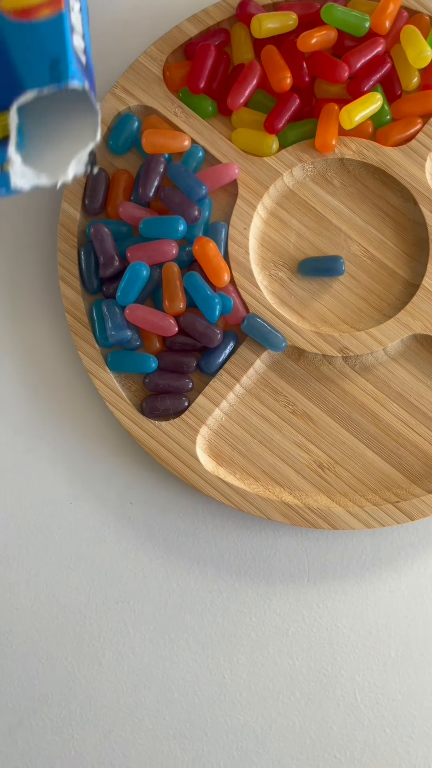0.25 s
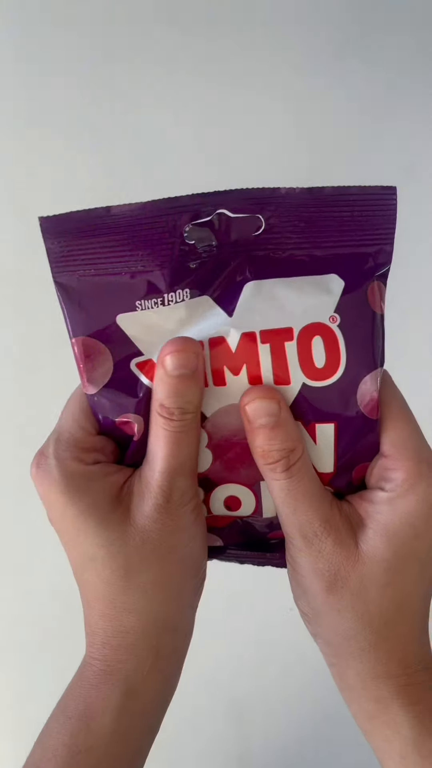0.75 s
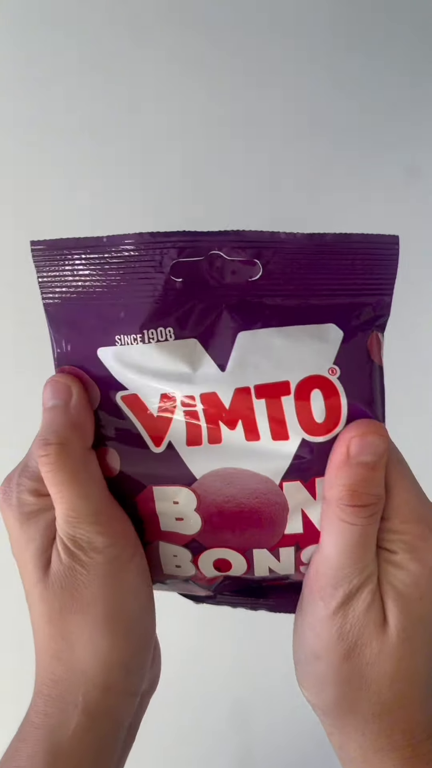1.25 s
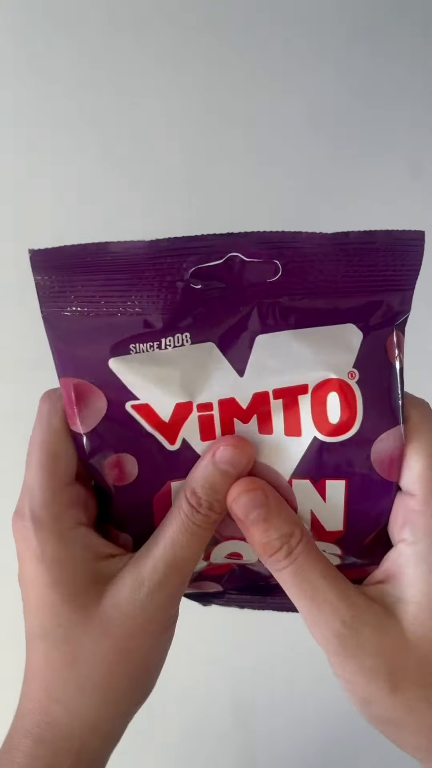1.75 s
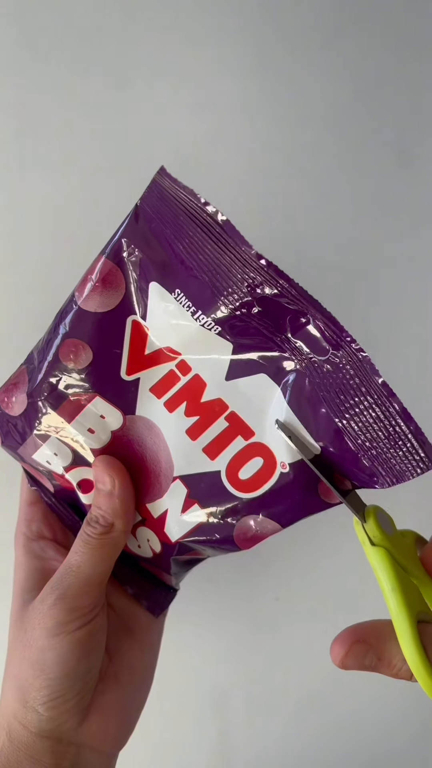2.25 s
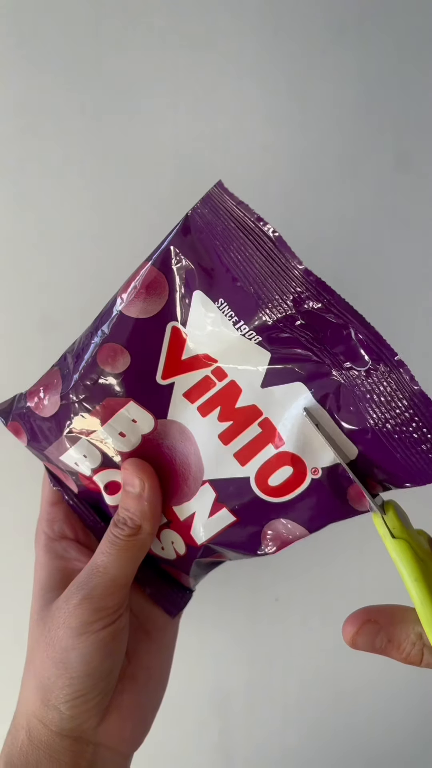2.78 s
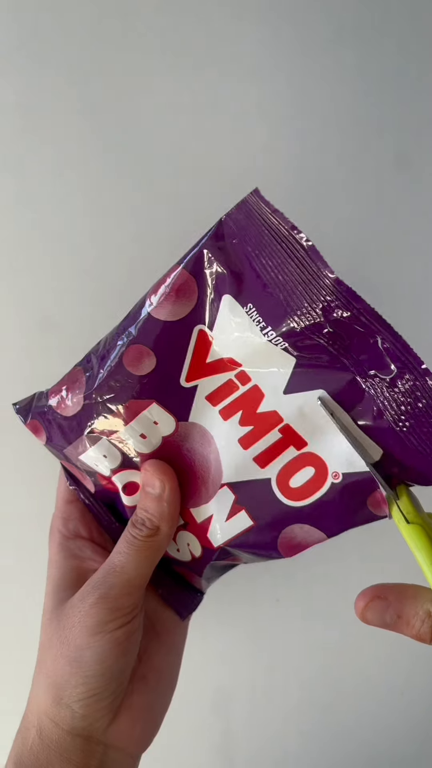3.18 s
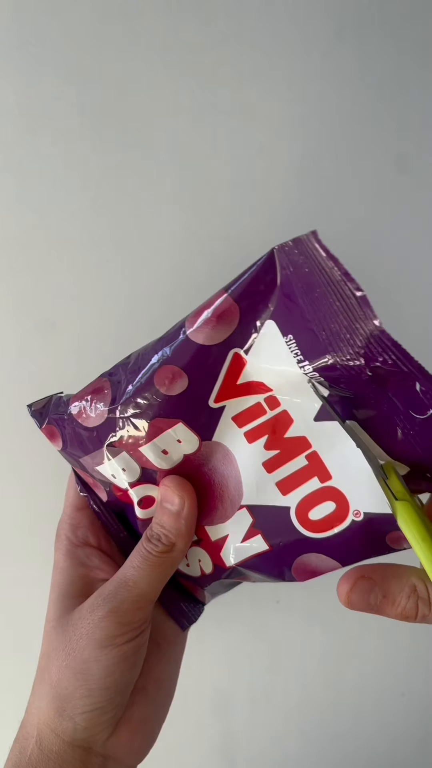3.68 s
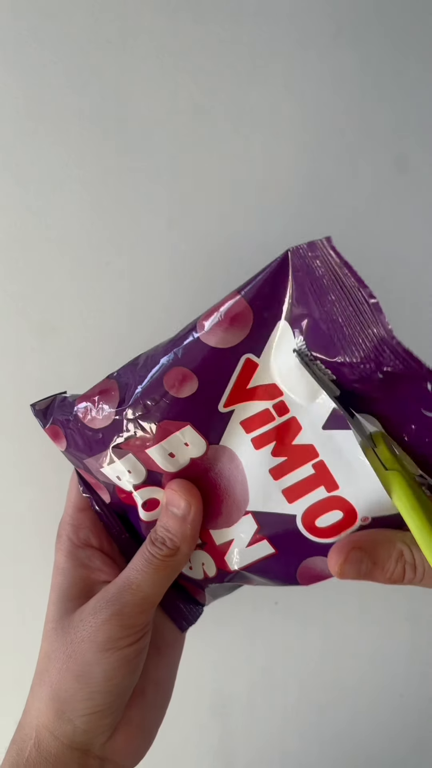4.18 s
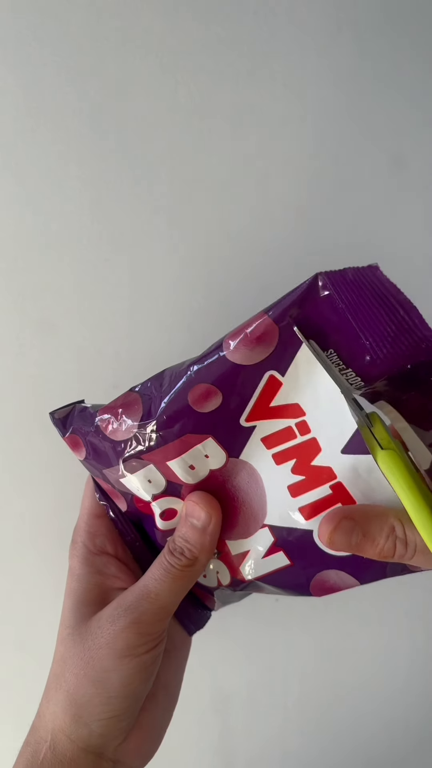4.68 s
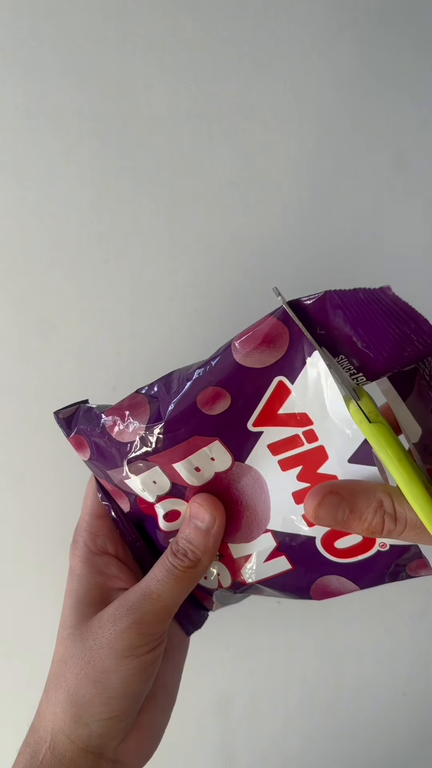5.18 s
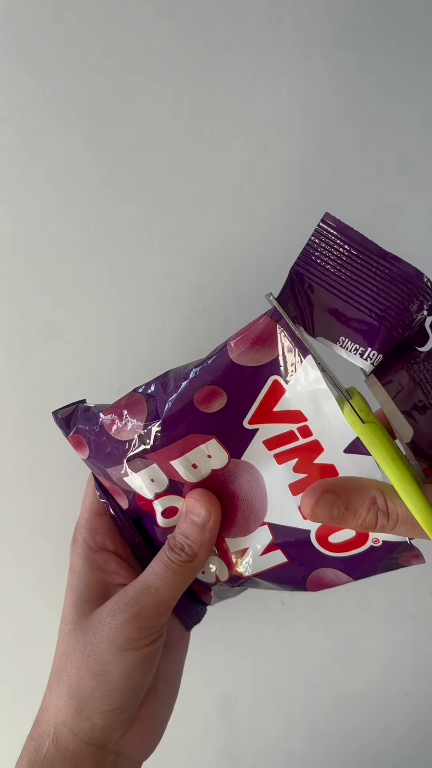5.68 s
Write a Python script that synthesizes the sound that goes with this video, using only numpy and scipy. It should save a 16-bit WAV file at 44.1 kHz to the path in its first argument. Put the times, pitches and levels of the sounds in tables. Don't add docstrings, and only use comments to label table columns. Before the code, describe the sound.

Close up in a small dry room, hard sweets pour from a cardboard box onto a wooden platter with a woody rattle that swells and thins. An abrupt cut brings loud, crisp foil-bag crackling in three squeezes. Another cut leads to softer, sparser crinkles as scissors bite through, with two small hollow handle knocks and faint table bumps. Phone microphone just above.

```python
import sys
import numpy as np
from scipy import signal
from scipy.fft import rfft, irfft, next_fast_len
from scipy.io import wavfile

SR = 44100
rng = np.random.default_rng(int(sys.argv[2]) if len(sys.argv) > 2 else 0)


def waveform_to_disk(signal):
    frames = np.transpose(np.atleast_2d(signal))
    scaled = np.clip(frames, -1, 1) * 32767
    samples = np.round(scaled).astype(np.int16)
    wavfile.write(sys.argv[1], SR, samples)


def voltage_ratio(decibels):
    exponent = np.asarray(decibels, float) / 20
    return 10 ** exponent


N = 261954
TIME_S = np.arange(N) / SR
KNEAD_START_S, CUT_START_S = 0.622, 2.008
KNEADING = TIME_S < CUT_START_S
FOIL_CYCLES, SWEET_CYCLES = 6.5, 14


def unit(x):
    return x / np.sqrt(np.mean(x ** 2) + 1e-20)


def peak_one(rows):
    return rows / np.abs(rows).max(axis=1, keepdims=True)


def in_time(rows):
    start_s, *columns = np.transpose(rows)
    return [np.interp(TIME_S, start_s, column) for column in columns]


def at_hz(points, hz):
    table_hz, value = np.transpose(points)
    return np.interp(np.log(hz + 1), np.log(table_hz + 1), value)


def band(x, low_hz, high_hz):
    edges_hz = [low_hz, min(high_hz, 0.45 * SR)]
    return signal.sosfilt(signal.butter(2, edges_hz, "band", fs=SR, output="sos"), x)


def dull(x):
    return signal.sosfilt(signal.cheby2(8, 45, 12400 + 900, fs=SR, output="sos"), x)


def shape(x, gain):
    size = next_fast_len(N + 4096)
    spectrum = rfft(x, size) * gain(np.fft.rfftfreq(size, 1 / SR))
    return irfft(spectrum, size)[..., :N]


def ring(x, hz, t60_s):
    decay, turn = voltage_ratio(-60 / (t60_s * SR)), 2 * np.pi * hz / SR
    poles = [1, -2 * decay * np.cos(turn), decay * decay]
    return signal.lfilter([0, np.sin(turn)], poles, x + 1e-18)


def grains(per_s, spread_db, clump_db):
    clumps = np.repeat(rng.standard_normal(N // 256 + 1), 256)[:N]
    sizes = voltage_ratio(spread_db * np.minimum(rng.exponential(1, N), 4) + clump_db * clumps)
    return sizes * rng.choice([-1, 1], N) * (rng.random(N) < per_s / SR)


def snaps(table, rise_s, burst_s, cycles, tone, body_db, thud_db, crack_db):
    start_s, peak_db, body_hz, high_db = np.transpose(table)
    lead = 150
    t = np.arange(-lead, 1050) / SR
    noise = rng.standard_normal((len(start_s), len(t)))
    dying = np.exp(-t / burst_s) + voltage_ratio(-8.0) * np.exp(-t / (6 * burst_s))
    ragged = noise * np.abs(noise) * np.where(t < 0, np.exp(t / rise_s), dying)
    ragged[:, t == 0] += 11.0
    rung = np.array([ring(row, hz, cycles / hz) for row, hz in zip(ragged, body_hz)])
    click = peak_one(band(ragged, 900, 5500))
    body = peak_one(tone * peak_one(rung) + click)
    thud = peak_one(band(ragged, 290, 950))
    brief = ragged * np.exp(-np.abs(t) / (4.5 * burst_s))
    crack = peak_one(band(brief, 5200, 16000))
    out = np.zeros(N + len(t))
    for k, at in enumerate((start_s * SR).astype(int)):
        mix = voltage_ratio(body_db) * body[k] + voltage_ratio(thud_db) * thud[k] + voltage_ratio(high_db[k] + crack_db) * crack[k]
        out[at:at + len(t)] += voltage_ratio(peak_db[k]) * mix
    return out[lead:N + lead]


def echoes(x, length, decay):
    spot = np.repeat(rng.integers(0, 6, len(x) // 400 + 1), 400)[:len(x)]
    tails = rng.standard_normal((6, length)) * decay(np.arange(length) / SR)
    tails = tails / np.sqrt(np.sum(tails ** 2, axis=1, keepdims=True))
    return sum(signal.fftconvolve(x * (spot == k), tail)[:len(x)] for k, tail in enumerate(tails))


def hum():
    return voltage_ratio(-99) * unit(band(rng.standard_normal(N), 40, 3000))


def room(x):
    t60_s, tail_db, slap_s, slap_db = 0.18, -14, 0.001276, -18
    lag = round(slap_s * SR)
    slap = voltage_ratio(slap_db) * np.concatenate([np.zeros(lag), x[:-lag]])
    tail = echoes(dull(x), SR // 4, lambda t: voltage_ratio(-60 * t / t60_s) * np.clip(t / 0.0057, 0, 1))
    return x + slap + voltage_ratio(tail_db) * tail


def thumps():
    # start_s, peak_db
    bumps = [(0.659, -49), (0.922, -49), (1.128, -54), (1.131, -41), (1.282, -55), (1.576, -67),
             (1.67, -40.5), (2.211, -44), (2.519, -57), (2.645, -67), (2.732, -49), (3.41, -45),
             (3.586, -56), (3.708, -63), (3.938, -46), (4.145, -45.5), (4.388, -48.5), (4.586, -47),
             (4.761, -51), (5.216, -50), (5.325, -55), (5.444, -46.5)]
    rise_s, fall_s, level_db = 0.0053, 0.022, 9
    push = np.zeros(N)
    for start_s, peak_db in bumps:
        since_s = TIME_S - start_s
        push += voltage_ratio(peak_db) * np.clip(since_s / rise_s, 0, 1) * np.exp(-np.maximum(since_s, 0) / fall_s)
    return voltage_ratio(level_db) * push * unit(band(rng.standard_normal(N), 80, 260))


def scissors():
    # start_s, peak_db, pitch_hz, t60_s
    handles = [
        (4.168, -29, 667, 0.05),
        (5.448, -31, 653, 0.054),
    ]
    out = np.zeros(N)
    for start_s, peak_db, pitch_hz, t60_s in handles:
        click = TIME_S * SR
        click = np.arange(N) == round(start_s * SR)
        out += ring(voltage_ratio(peak_db) * click, pitch_hz, t60_s)
    return out


def grip():
    # start_s, level_db
    squeeze = [
        (0.621, -33),
        (0.732, -52),
        (0.846, -43.5),
        (0.934, -38.5),
        (1.032, -47.5),
        (1.183, -31),
        (1.27, -34),
        (1.552, -40),
        (1.902, -33),
        (2.005, -48),
    ]
    return in_time(squeeze)[0]


def strain(settle_db_per_s, rub_share):
    # greatest_strain_s, crinkle_db, build_up_s, hand_rub_re_crinkle_db
    strokes = [(2.03, -56.5, 0.046, 6), (2.126, -40.5, 0.06, -17), (2.221, -31.5, 0.047, -21),
               (2.458, -41, 0.041, -33.5), (2.55, -58.5, 0.12, 12.5), (2.669, -42, 0.09, -3),
               (2.748, -40, 0.04, -39), (2.902, -41, 0.086, -5.5), (3.077, -45, 0.24, -4),
               (3.246, -35, 0.044, -7.5), (3.299, -36.5, 0.11, -13), (3.427, -38, 0.073, -10.5),
               (3.607, -36, 0.064, -18), (3.753, -41, 0.079, -3), (4.025, -42, 0.21, -6),
               (4.135, -35.5, 0.032, -12), (4.18, -42, 0.17, -10), (4.293, -51.5, 0.071, -9),
               (4.42, -38, 0.079, -10), (4.48, -37.5, 0.046, -16), (4.614, -34.5, 0.085, -22),
               (4.79, -49, 0.047, 8.5), (4.844, -38, 0.12, -17.5), (5.036, -44, 0.17, -9),
               (5.229, -50, 0.032, -8), (5.335, -47, 0.02, -3.5), (5.458, -46, 0.032, 0.5),
               (5.903, -47.5, 0.24, -10.5)]
    build_db, build_curve = 31.5, 2.63
    peak_s, crinkle_db, build_s, rub_db = np.transpose(strokes)[:, :, None]
    t = np.arange(0, N / SR + 0.01, 0.002)
    building_db = build_db * (np.abs(peak_s - t) / build_s) ** build_curve
    loss_db = np.where(t < peak_s, building_db, settle_db_per_s * (t - peak_s))
    strongest_db = (crinkle_db + rub_share * rub_db - loss_db).max(axis=0)
    return np.interp(TIME_S, t, strongest_db)


def hands(grip_db):
    thumbs_only_db = 1.5 * (TIME_S < 1)
    knead_rub_db = grip_db - 6.5 - thumbs_only_db
    cut_rub_db = np.maximum(strain(settle_db_per_s=158.5, rub_share=0.66), -80)
    rub_db = np.where(KNEADING, knead_rub_db, cut_rub_db)
    rub = band(grains(per_s=2100, spread_db=2.5, clump_db=7.5), 200, 750)
    rumble = band(grains(per_s=560, spread_db=4.5, clump_db=2.5), 76, 237)
    return voltage_ratio(rub_db - 3.0) * unit(rub) + voltage_ratio(0.67 * rub_db - 22.5) * unit(rumble)


def jostle(grip_db):
    knocks = band(grains(per_s=160, spread_db=3.0, clump_db=3.5), 605, 1080)
    return KNEADING * voltage_ratio(grip_db - 7) * unit(knocks)


def crinkle(grip_db):
    # freq_hz, gain_db
    foil = [(500, 3), (1000, -2), (2000, -1.5), (3000, 2.5), (4500, -8.5), (7000, -10), (12000, -5),
            (16000, 12)]
    level_db = np.where(KNEADING, grip_db, strain(settle_db_per_s=238.5, rub_share=0))
    creases = grains(per_s=4000, spread_db=3.0, clump_db=2.5)
    fine = dull(shape(creases, lambda hz: voltage_ratio(at_hz(foil, hz))))
    return voltage_ratio(level_db - 8.0) * unit(fine)


def creases():
    # start_s, body_peak_db, body_hz, crack_re_body_db big creases under the thumbs, through all
    thumb_creases = [(0.6553, -18, 1670, 5.5), (0.6693, -15.5, 2650, 2.5), (0.6753, -31, 2130, -2.5),
                     (0.7052, -21.5, 1440, 17), (0.7145, -15.5, 1800, 3), (0.729, -21.5, 3120, 20),
                     (0.7736, -18.5, 2530, 18.5), (0.8216, -25, 1350, 6), (0.8541, -25.5, 1500, 14),
                     (0.8683, -22, 2680, 13), (0.8891, -23, 1530, 14.5), (0.9214, -16, 2760, 9.5),
                     (0.9384, -18.5, 2900, 12), (0.9617, -17.5, 1910, 10.5), (0.977, -23.5, 1870, -4),
                     (1.058, -26.5, 2200, -8), (1.0676, -18.5, 2630, 7), (1.0819, -19, 4450, 14),
                 (1.1209, -20, 2200, 10.5), (1.1441, -12, 2090, 10), (1.15, -13, 2730, 3),
                 (1.1728, -24, 2160, 18.5), (1.184, -15, 2500, 21.5), (1.2008, -14.5, 2370, 9),
                 (1.211, -15.5, 3080, 8), (1.232, -22, 2450, -7.5), (1.278, -21.5, 1780, 13),
                 (1.2886, -11, 2525, 17.5), (1.298, -19.5, 1540, 11), (1.3297, -21, 4700, 9),
                 (1.3457, -18.5, 4070, 16), (1.3698, -18.5, 5300, -1.5), (1.3807, -26, 3680, 8),
                 (1.4027, -19.5, 2430, 10), (1.4159, -20, 2260, -6), (1.4436, -22, 4830, 6.5),
                 (1.451, -15, 2650, -12), (1.4624, -19, 2840, -0.5), (1.4912, -18.5, 2650, 11.5),
                 (1.5232, -20, 4050, 14.5),
                     (1.5669, -14, 5050, 18.5), (1.585, -14, 2770, -50), (1.6467, -12.5, 2520, 5.5),
                 (1.6748, -14.5, 2230, 6), (1.6912, -17.5, 3720, -11), (1.7271, -12.5, 2720, -28.5),
                 (1.7468, -9.5, 3100, 10), (1.7636, -17.5, 2840, -19), (1.774, -15.5, 2840, 10.5),
                 (1.81, -18, 1420, 5), (1.8191, -17, 2100, 12), (1.85, -16.5, 2130, 15),
                 (1.8623, -16, 4980, 10.5), (1.8796, -13, 796, -14.5), (1.8933, -13.5, 1570, 12),
                 (1.9004, -11, 2970, 5), (1.9078, -26.5, 1870, -19), (1.923, -12.5, 900, 12),
                 (1.963, -27.5, 1320, 10.5), (1.991, -29.5, 2370, 2)]
    # start_s, body_peak_db, body_hz,
    # crack_re_body_db
    blade_creases = [(2.005, -38, 4600, -17), (2.078, -28.5, 3580, -51), (2.1156, -29, 2450, 17),
                     (2.1611, -30, 1480, 7), (2.2093, -23.5, 2600, 1), (2.222, -31, 3700, 17.5),
                     (2.2337, -22, 3450, -11), (2.316, -35, 2550, 20.5), (2.4481, -39.5, 2350, 18),
                     (2.4875, -35.5, 1390, 6.5), (2.5189, -33, 2840, -5.5), (2.6775, -31.5, 2560, -1.5),
                     (2.7383, -21.5, 3300, 17.5), (2.8646, -27.5, 3150, 12), (2.8749, -27.5, 2580, -21),
                     (2.941, -25, 3460, 10), (2.9833, -35, 3290, 12), (3.0312, -26.5, 2450, 9),
                     (3.0573, -29.5, 3570, 17), (3.0877, -30.5, 3020, 9), (3.1026, -37.5, 4060, 10),
                     (3.1884, -40, 2160, 3.5), (3.2271, -35, 2560, 13), (3.4025, -36, 2860, 12),
                     (3.413, -24.5, 3350, 14), (3.492, -31.5, 2800, 6.5), (3.5735, -42, 2700, -1),
                     (3.7434, -29.5, 2930, 7.5),
                     (3.943, -33, 2680, 11.5), (3.9729, -32.5, 2920, 6), (4.0133, -31.5, 3320, 16.5),
               (4.0286, -33.5, 2950, 13.5), (4.1402, -27, 4040, 15), (4.169, -28.5, 3120, 6.5),
               (4.268, -32.5, 3530, 13.5), (4.2969, -37.5, 1450, 15), (4.4086, -24, 3100, 9),
               (4.4736, -38, 1550, 18.5), (4.593, -25, 2400, 8.5), (4.6166, -23.5, 2200, 10),
               (4.6576, -29.5, 2920, 5), (4.78, -33, 3020, 9), (4.8459, -27, 5060, 9.5),
               (5.016, -27.5, 4140, 11.5), (5.149, -40.5, 3320, -22), (5.2194, -23, 3380, 9.5),
               (5.322, -27.5, 3250, 8), (5.3466, -29, 3430, 11.5), (5.4495, -26.5, 4040, 8.5),
               (5.462, -40.5, 2520, 13), (5.52, -54, 890, -25), (5.5819, -49, 1924, -5),
               (5.7173, -33, 2300, 2.5), (5.809, -36.5, 3500, -17), (5.8526, -29, 3650, 14)]
    small_ticks = [(1.139, -21, 2200, 6), (1.1815, -28, 2520, 13), (1.1935, -24, 2180, 7.5),
                   (1.8065, -27, 1510, 0.5), (2.0574, -38, 3760, -4), (3.0155, -34, 2520, 2),
                   (3.222, -47, 2500, 1), (3.387, -46.5, 2500, 11.5), (4.121, -32.5, 2190, -3),
                   (5.884, -43.5, 1420, -3)]
    # start_s, body_peak_db, body_hz,
    # crack_re_body_db
    lesser_creases = [(0.7235, -28.5, 2310, 6), (0.7367, -27, 2870, -1), (0.7463, -32, 2250, -1),
                      (0.7641, -22, 2080, -14.5), (0.7974, -20, 2450, -6), (0.806, -34, 2470, -9),
                      (0.8126, -26, 2280, 0), (0.9041, -47, 990, -7), (0.9314, -21, 2670, -16),
                      (0.946, -35, 2020, -8), (1.0991, -30.5, 2480, 5), (1.135, -28.5, 2200, 1.5),
                      (1.1789, -16, 2090, -6), (1.2182, -25, 2200, -12), (1.2535, -31, 3850, -16),
                      (1.2596, -24, 2156, -6), (1.2865, -11.5, 2280, -9), (1.3113, -17.5, 2526, -3),
                      (1.3531, -25, 2670, -7), (1.3638, -22.5, 2800, 3), (1.5103, -31, 1640, -12),
                      (1.5578, -42, 2540, -13.5), (1.6056, -28.5, 1980, -7), (1.653, -34, 2200, -11),
                      (1.6622, -24.5, 690, -23), (1.7026, -19, 1420, -8), (1.7549, -26, 2230, -6),
                      (1.7999, -24.5, 1420, -9), (1.8553, -22, 914, -8.5), (1.8703, -21, 2450, -5),
                      (1.8962, -18.5, 2450, 11),
                      (2.151, -27, 655, -20), (2.2599, -31, 3320, 3), (2.191, -37, 4500, 11),
                    (2.4532, -31, 2600, 6), (2.5573, -35.5, 2670, -9), (2.578, -48.5, 2410, 6.5),
                    (2.651, -30, 2630, -3), (2.695, -36, 2360, -4), (2.7323, -29.5, 2540, -15),
                    (2.746, -39, 2600, 10), (2.8325, -36, 1420, -2), (2.8468, -40, 2200, 1),
                    (2.8819, -33, 590, 8), (2.906, -39, 2200, -6), (2.92, -27, 2320, -4),
                    (3.0093, -35, 2410, 2), (3.047, -36, 985, -6), (3.0973, -35, 2450, 17),
                    (3.2393, -31, 3420, -12), (3.2913, -35, 2450, 8), (3.3195, -44, 2200, 1),
                    (3.4427, -36, 4050, 9), (3.458, -37, 2540, -9), (3.485, -44, 3400, 5),
                    (3.5599, -52, 2200, 4), (3.587, -43, 2540, -13), (3.6506, -48, 3570, -4),
                    (3.7149, -33, 3030, -12), (3.7193, -43, 2280, -5), (3.73, -33, 2340, -8),
                    (3.7501, -31.5, 2630, 6.5), (3.7957, -55, 2420, -5), (3.8437, -47, 1600, -2),
                      (3.869, -38, 2200, -3), (3.8977, -33.5, 1450, 0), (3.961, -32.5, 1520, -1),
                    (4.18, -25.5, 3040, -11), (4.1863, -27.5, 1400, 5.5), (4.284, -40, 4050, -1),
                    (4.373, -40, 2470, -14), (4.3823, -34, 1590, -3), (4.42, -27.5, 3270, 1),
                    (4.4242, -39, 2500, 9.5), (4.5706, -43, 2840, -4), (4.5822, -36, 2600, 4),
                    (4.604, -50, 2500, -4), (4.6115, -32, 2800, 13), (4.6428, -49, 3010, 10),
                    (4.6803, -37, 1730, -10), (4.823, -32.5, 2520, 5), (4.8367, -34, 3320, -12),
                    (4.8523, -50, 690, 14), (4.931, -41.5, 2800, 6), (4.955, -53, 1450, 10.5),
                    (5.0118, -46, 2500, 7), (5.0706, -37, 664, 2), (5.194, -54, 4000, 6),
                    (5.208, -55, 2970, 8), (5.4256, -46.5, 4140, 7.5), (5.453, -23.5, 2420, 3.5),
                    (5.4664, -42, 4220, -2), (5.4455, -35, 2440, 8), (5.834, -58, 1380, -3)]
    kneading = snaps(thumb_creases, rise_s=0.00073, burst_s=0.00075,
                     cycles=FOIL_CYCLES, tone=0.92, body_db=3.5, thud_db=-26.5, crack_db=-4.5)
    cutting = snaps(blade_creases, rise_s=0.00064, burst_s=0.0009,
                    cycles=FOIL_CYCLES, tone=1.0, body_db=7.5, thud_db=-8.5, crack_db=2.5)
    ticks = snaps(small_ticks, rise_s=0.0014, burst_s=0.00038,
                  cycles=FOIL_CYCLES, tone=0.91, body_db=9.0, thud_db=-5.0, crack_db=10.0)
    crackle = snaps(lesser_creases, rise_s=0.0008, burst_s=0.00043,
                    cycles=FOIL_CYCLES, tone=1.0, body_db=3.5, thud_db=-23.5, crack_db=6.0)
    return kneading + cutting + ticks + dull(crackle)


def bag():
    grip_db = grip()
    return creases() + jostle(grip_db) + crinkle(grip_db) + hands(grip_db)


def sweets():
    # start_s, body_peak_db, body_hz, crack_re_body_db
    clacks = [(0.001, -26.5, 1300, 6.5), (0.021, -28.5, 840, -12), (0.0698, -28.5, 757, 0),
              (0.0936, -29, 2150, 5), (0.1112, -31.5, 1780, 3), (0.1467, -31.5, 1420, 8.5),
              (0.1624, -32.5, 1235, 6.5), (0.2045, -33.5, 1750, 7.5), (0.2073, -22, 1500, 2.5),
              (0.2498, -25.5, 1850, 17), (0.2555, -29, 1824, 8.5), (0.2607, -19, 1110, -16),
              (0.2765, -29.5, 1340, 2.5), (0.2928, -20.5, 1796, 2.5), (0.2958, -12, 2450, 1),
              (0.3133, -24.5, 2450, -3), (0.3235, -22.5, 1350, -5), (0.3285, -23.5, 1420, 17.5),
              (0.336, -23, 1900, 1.5), (0.3454, -25.5, 1090, 0), (0.3665, -23, 1800, 16.5),
              (0.3703, -27, 1790, 9), (0.3781, -13.5, 1603, -15.5), (0.3845, -20.5, 1750, 14.5),
              (0.3959, -20, 1580, -12), (0.4105, -20, 1540, 12), (0.4261, -22, 1500, 7.5),
              (0.4731, -28.5, 1740, -3), (0.478, -40, 1600, -6), (0.4889, -25, 1740, 14.5),
              (0.4946, -33, 1860, -18), (0.5029, -29, 1680, 5.5), (0.5505, -31.5, 1560, 10),
              (0.5785, -27, 2000, 13.5)]
    # start_s, flow_db, bare_wood_part_db
    pour = [
        (0.0, -44.5, -14),
        (0.141, -49, -8.5),
        (0.238, -40, -19.5),
        (0.257, -29, -1),
        (0.375, -23.5, -21),
        (0.46, -40, -11.5),
        (0.5, -34.5, -12.5),
        (0.544, -46, -17),
        (0.62, -48, -12.5),
    ]
    # pitch_hz, level_db, t60_s
    wood_modes = [(250, -5, 0.048), (296.4, 2, 0.097), (655, 0.5, 0.043), (826, 7.5, 0.035),
                  (1054, 6.5, 0.0099), (1160, -2, 0.032), (1420, 7, 0.043), (1620, 8, 0.0092),
                  (1800, 6.5, 0.011), (2200, 2, 0.0056), (2450, 0.5, 0.012)]
    drum_notes, modes = wood_modes[:2], wood_modes[2:]
    rattle_db, bare_db = in_time(pour)
    shell_db = -46 + 1.43 * (rattle_db + 45.0)
    boom_db = rattle_db + bare_db
    landings = snaps(clacks, rise_s=0.0017, burst_s=0.00091,
                     cycles=SWEET_CYCLES, tone=1.28, body_db=5.0, thud_db=-5.0, crack_db=-4.0)
    hail = unit(grains(per_s=2200, spread_db=3.0, clump_db=1.5))
    struck = voltage_ratio(rattle_db) * hail + voltage_ratio(-31.5) * landings
    spot_db = 3.5 * np.repeat(rng.standard_normal((len(wood_modes), N // 300 + 1)), 300, axis=1)[:, :N]
    wood = np.zeros(N)
    for k, (pitch_hz, level_db, t60_s) in enumerate(modes):
        wood += voltage_ratio(level_db - 31) * (-1) ** k * ring(struck * voltage_ratio(spot_db[k]), pitch_hz, t60_s)
    hollow = sum(voltage_ratio(level_db) * ring(hail, pitch_hz, t60_s) for pitch_hz, level_db, t60_s in drum_notes)
    boom = voltage_ratio(boom_db + 9.5) * unit(hollow)
    shells = unit(band(grains(per_s=4000, spread_db=2.5, clump_db=2.5), 2500, 12000))
    knocks = voltage_ratio(rattle_db - 2.0) * unit(band(hail, 750, 2400))
    return band(landings + wood + knocks + boom + voltage_ratio(shell_db - 20.0) * shells, 110, SR)


def scene():
    handling = bag() + scissors() + thumps()
    played = np.where(TIME_S < KNEAD_START_S, dull(sweets()), handling)
    shots = np.split(played, [round(KNEAD_START_S * SR), round(CUT_START_S * SR)])
    x = np.concatenate([room(shot) for shot in shots]) + hum()
    return np.array([x, x])


def band_limit(x):
    return signal.sosfilt(signal.butter(12, 16540, fs=SR, output="sos"), x)


def record(dry):
    # freq_hz, gain_db
    mic = [(20, -25), (60, -11), (200, -10.5), (1000, -4), (8000, 8.5), (10600, 10), (12200, -2.5),
           (13500, -19), (16000, -15), (17000, -45)]
    # freq_hz, left_port_lead_rad
    lead = [(20, 0), (2000, 0), (3100, 2.4), (3600, 6.8), (4620, 8.0), (4900, 9.4), (5200, 11.1),
            (5900, 12.5), (7500, 14.2), (8300, 15.45), (9500, 15.85), (10500, 17.2), (12000, 18.7),
            (13300, 18.9), (15200, 21.7)]
    # freq_hz, likeness_0_to_1
    likeness = [(30, .985), (450, .985), (650, .8), (1000, .92), (2000, .985), (2700, .85), (3400, .35),
                (4200, .65), (4900, .86), (6500, .8), (8300, .93), (9600, .92), (11500, .8), (14000, .7)]
    limit = 0.95
    scattered = echoes(dry[0], 300, lambda t: np.exp(-t / 0.001))

    def alike(hz):
        return np.clip(at_hz(likeness, hz), 0, 1)

    def port(hz, sign):
        return voltage_ratio(at_hz(mic, hz)) * np.exp(0.5j * sign * at_hz(lead, hz))

    sides = []
    for sign in (1, -1):
        shared = shape(dry[0], lambda hz: port(hz, sign) * np.sqrt((1 + alike(hz)) / 2))
        own = shape(scattered, lambda hz: port(hz, sign) * np.sqrt((1 - alike(hz)) / 2))
        sides.append(shared + sign * own)
    return band_limit(limit * np.tanh(np.array(sides) / limit))


dry = scene()
out = record(dry)
waveform_to_disk(out)
```